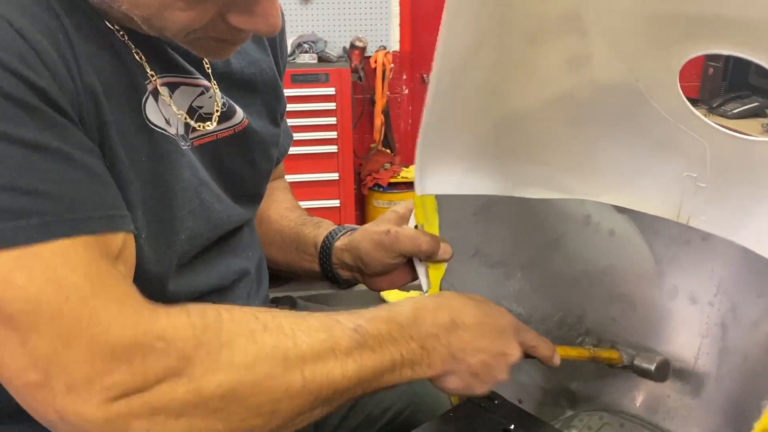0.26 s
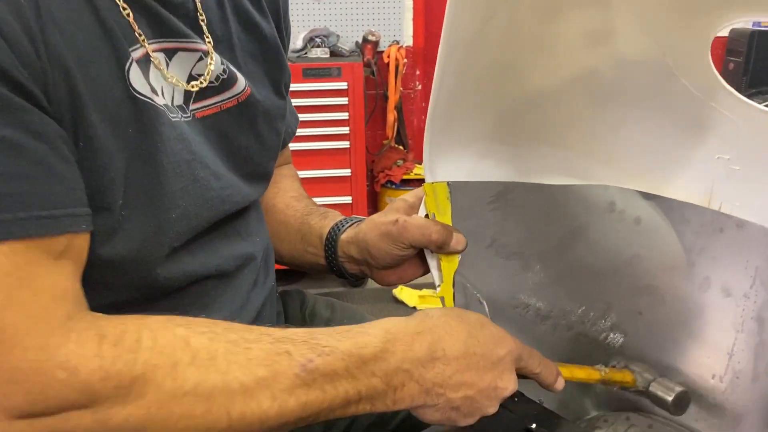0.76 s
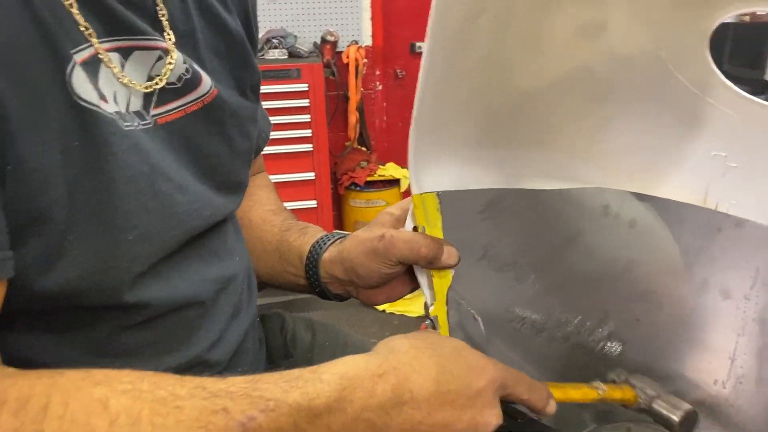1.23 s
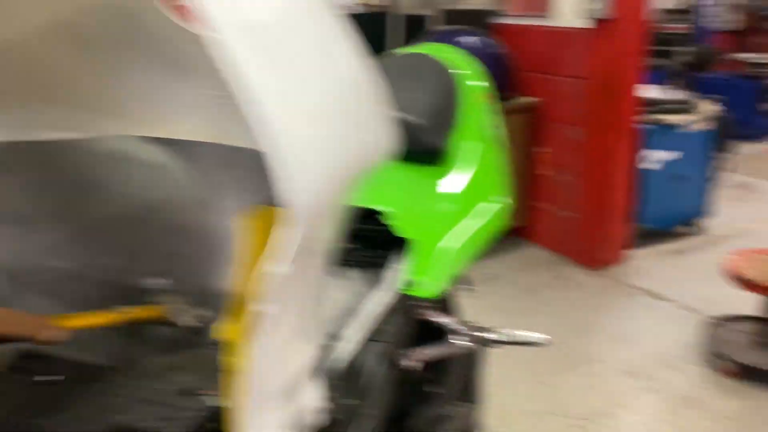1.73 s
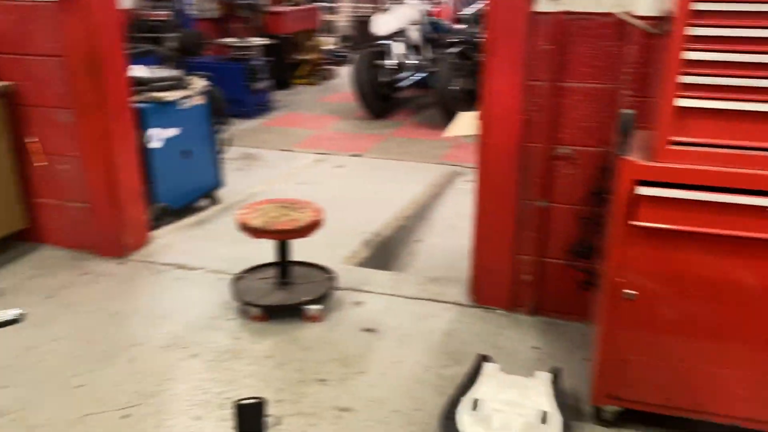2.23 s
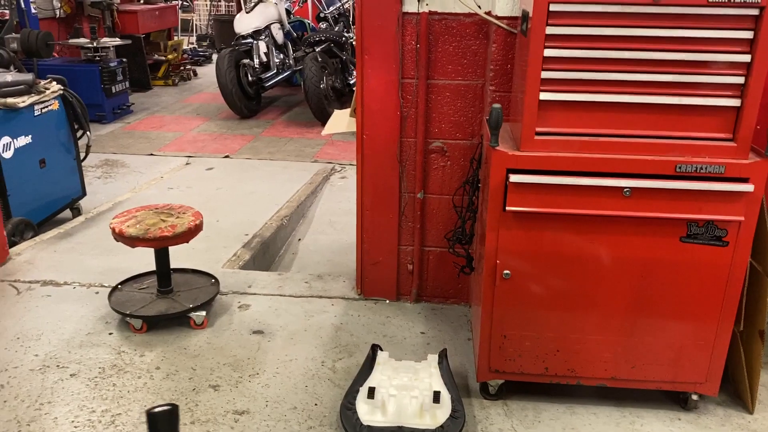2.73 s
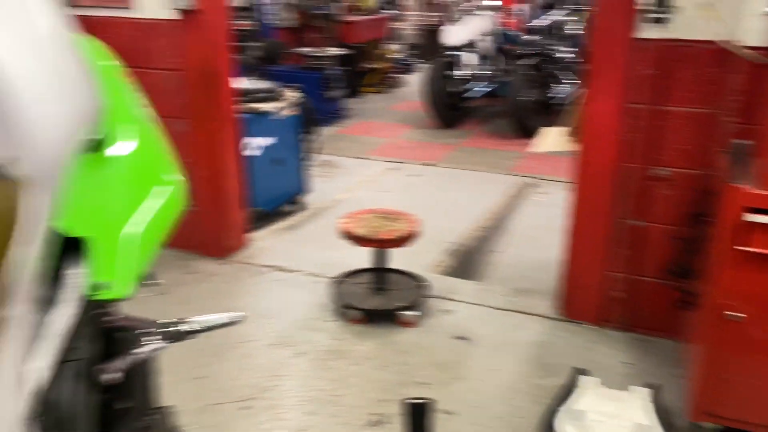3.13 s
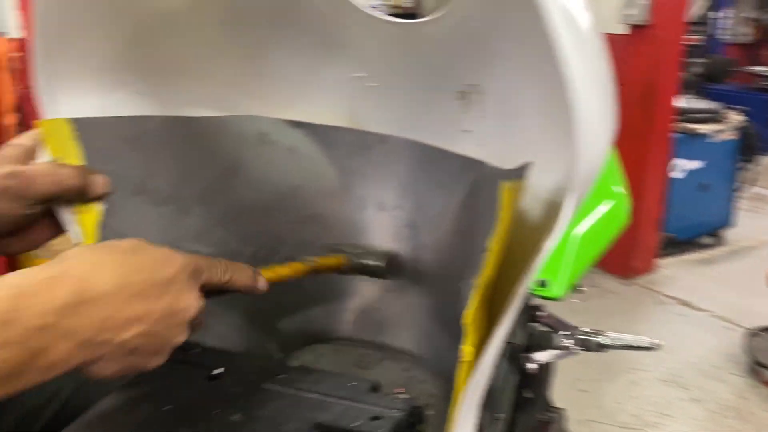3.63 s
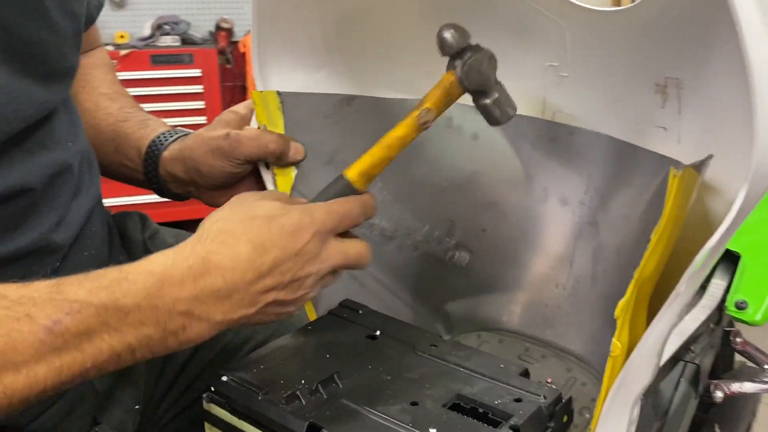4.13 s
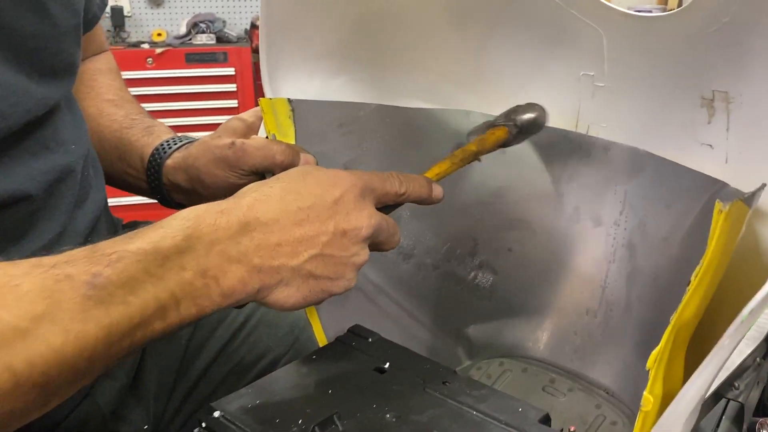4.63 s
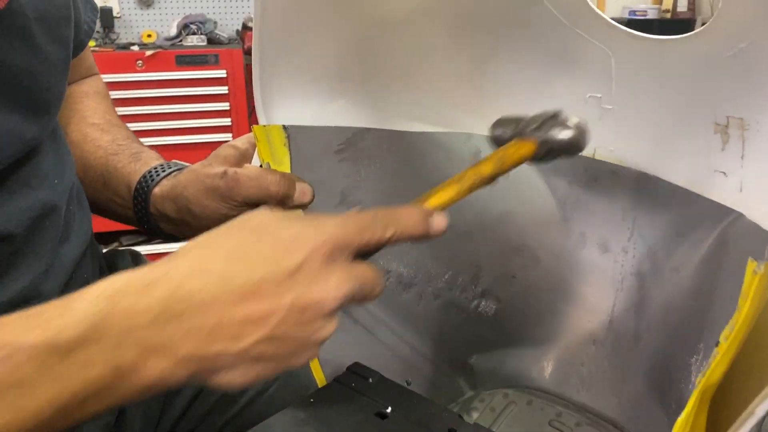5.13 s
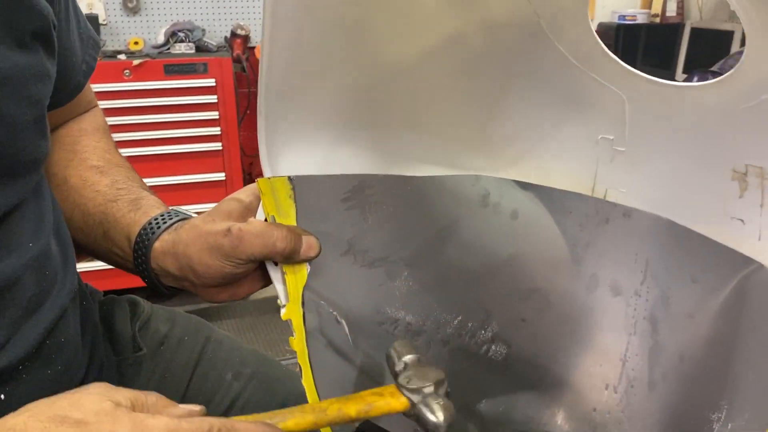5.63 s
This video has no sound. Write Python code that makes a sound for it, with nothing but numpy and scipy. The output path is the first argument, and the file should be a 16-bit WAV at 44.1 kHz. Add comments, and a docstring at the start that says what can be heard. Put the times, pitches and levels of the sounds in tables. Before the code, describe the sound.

Close in a hard-walled workshop, a hammer hits a steel panel backed by a tool. Three sharp, clanging blows come in the first second, then a soft ringing tap and light dull knocks. After a near-quiet pause, a light tap leads to several spaced blows with bright clank and low panel boom. One brief metallic squeak follows a late blow. Low rumble and faint machine hum lie beneath; stereo microphone, short room tail.

```python
"""Hammering a steel panel

A hammer beats a steel fender panel against a backing tool, in short runs, in a workshop.
Each blow sends a dispersive bending wave through the sheet (treble first, bass last), sets its dense,
hand-damped modes clanging as decaying noise bands and sines, and flexes the whole panel in a low boom.
Tools knock lightly (short modal decays); band noise makes a lingering ring, faint hisses and a squeak.
Reverberation answers, low rumble and wavering hum lie beneath, and a limiter holds the peaks."""
import sys
import numpy as np
from scipy import signal
from scipy.fft import rfft, irfft, next_fast_len
from scipy.io import wavfile
from scipy.ndimage import uniform_filter1d, minimum_filter1d

SR = 44100
rng = np.random.default_rng(int(sys.argv[2]) if len(sys.argv) > 2 else 0)


def wrap_up_sound(samples):
    """Save the sound to the file named by the first command line argument, as 16-bit audio."""
    columns = np.atleast_2d(samples).T
    # keep every value between -1 and 1, then stretch to whole-number steps
    tamed = np.clip(columns, -1, 1)
    steps = np.round(tamed * 32767).astype(np.int16)
    wavfile.write(sys.argv[1], SR, steps)


N = 259308  # length [samples]

# the sheet's dense modes: (frequency [Hz], relative spectral density [dB per Hz])
SHEET_DENSITY = [(30, -18), (70, -15.5), (130, -9.5), (185, -3.5), (280, -3.5), (440, -13.5), (640, -0.5),
                 (1250, -6.5), (1650, -11), (3000, -15.5), (4500, -20), (6800, -25.5), (9000, -24.5),
                 (15000, -26), (16500, -31.5)]
# their decay before damping by the blow: (frequency [Hz], 60 dB decay time [s])
SHEET_DECAY = [(60, 0.28), (250, .24), (700, .16), (1400, .13), (3500, .1), (8000, 0.12), (15000, 0.017)]
# the strongest single modes: (frequency [Hz], relative level [dB], decay time before damping [s])
SINGLE_MODES = [(118, -8, 0.17), (137, -7, 0.99), (230.3, -12, 0.31), (273.6, -9, 0.8), (310, -16, 0.74),
                (634, -2.5, 0.23), (746, -8, 0.25), (781, -13.5, 0.14), (858, -9, .16), (1099, -6, 0.15),
                (1178, -2, 0.31), (1321, -4, 0.15), (2320, -16.5, 0.25), (2600, -16, 0.053),
                (3056, -20, .16), (3315, -9.5, 0.064)]
BANDS = 1000 * 2 ** (np.arange(-15, 13) / 3)  # third-octave centres [Hz]
FIRM_BLOW_DB = -21.5  # force at which the sheet's decay times are unscaled


def amp(db):
    """Level definition: decibels to amplitude ratio."""
    return 10 ** (np.asarray(db) / 20)


def along(points, hz):
    """Logarithmic pitch scale: (frequency [Hz], value) points are interpolated on it."""
    f, v = np.transpose(points)
    return np.interp(np.log(hz + 1), np.log(f + 1), v)


def bump(hz, centre_hz, octaves):
    """Resonance region: a Gaussian on the log-frequency axis, top 1."""
    return np.exp(-.5 * (np.log2((hz + 1) / centre_hz) / octaves) ** 2)


def burst(x):
    """Energy normalization: a transient is scaled to the energy of 20 ms at rms 1."""
    energy = np.sum(x ** 2, -1, keepdims=True)
    return x * np.sqrt(SR * .02 / (energy + 1e-20))


def add(track, s, sound):
    """Superposition: a sound is summed into the track at time s, cut at the track's ends."""
    start = round(s * SR)
    part = sound[..., max(-start, 0):N - start]
    begin = max(start, 0)
    track[:, begin:begin + part.shape[-1]] += part


def diffuse(size):
    """Diffuse field: stereo noise spectra whose left-right correlation varies with frequency."""
    # (frequency [Hz], left-right correlation [0 to 1])
    likeness = [(60, 1), (150, .93), (350, 0.55), (800, 0.39), (2000, 0.72), (5000, 0.14)]
    hz = np.fft.rfftfreq(size, 1 / SR)
    turn = np.arccos(np.clip(along(likeness, hz), 0, 1)) / 2
    mid, side = rfft(rng.standard_normal((2, size))) * [np.cos(turn), np.sin(turn)]
    return hz, np.array([mid + side, mid - side])


def background(level_db=-67.5, waver_db=3):
    """Stationary noise and tones: a low shop rumble under the faint, wavering hum of machines."""
    # rumble: (frequency [Hz], relative spectral density [dB per Hz])
    air_density = [(20, -18.5), (55, -4.5), (85, -7), (120, -10.5), (160, -3.5), (210, -27.5), (255, -16.5),
                   (330, -23.5), (480, -22), (650, -28.5), (1200, -31), (3000, -41), (10000, -36),
                   (16000, -44)]
    # distant machines: (frequency [Hz], rms level before wavering [dB])
    hum_tones = [(48.4, -78.5), (253, -86.5), (479, -88)]
    size, t = next_fast_len(N), np.arange(N) / SR
    hz, z = diffuse(size)
    air = irfft(z * amp(along(air_density, hz)), size)[:, :N]
    knots = np.linspace(0, t[-1], 20)
    hum = np.zeros(N)
    for f, db in hum_tones:
        waver = np.interp(t, knots, amp(waver_db * rng.standard_normal(len(knots))))
        hum += amp(db) * np.sqrt(2) * waver * np.sin(2 * np.pi * f * t)
    return amp(level_db) * air / air.std() + hum


def in_shop(sound, size=32768, first_wall_s=0.0058):
    """Reverberation: direct sound, then wall and floor reflections decaying exponentially by frequency."""
    # (frequency [Hz], 60 dB decay time [s])
    shop_decay = [(80, 1), (250, 0.67), (700, 0.44), (1500, 0.6), (4000, 0.6), (8000, 0.49), (15000, 0.16)]
    # (frequency [Hz], reverberation level [dB])
    shop_level = [(50, -22.5), (250, -8), (600, -10.5), (1500, -11.5), (4000, -13.5), (8000, -14),
                  (15000, -22.5)]
    hz, t, z = signal.stft(irfft(diffuse(size)[1]), SR, nperseg=256)
    t60 = along(shop_decay, hz)[:, None]
    unit_energy = np.sqrt(2 * np.log(1000) / (t60 * SR))
    fade = amp(along(shop_level, hz))[:, None] * np.exp(-np.log(1000) * t / t60) * unit_energy
    onset = 1 - np.exp(-(t / first_wall_s) ** 2)
    tail = signal.istft(z * fade * onset, SR, nperseg=256)[1]
    tail[:, 0] += 1  # the direct path
    return signal.fftconvolve(sound, tail, axes=1)


def travel(hz, lag_s=.014):
    """Dispersion: a bending wave's bass arrives last; lag_s is its delay at 100 Hz."""
    return lag_s * 100 / np.maximum(hz, 55)


def decays(band_db, t60, size):
    """Modal density: a crowd of modes as third-octave noise, each with its level, arrival and decay."""
    hz, z = diffuse(size)
    # neighbouring bands overlap so that their energies sum to one
    place = np.log((hz + 1) / BANDS[0]) / np.log(BANDS[1] / BANDS[0])
    distance = np.abs(place - np.arange(len(BANDS))[:, None])
    split = np.sqrt(np.maximum(1 - distance, 0)).astype(np.float32)
    age = np.maximum(np.arange(size) / SR - travel(BANDS)[:, None], 0).astype(np.float32)
    rise = (0.0011 + 1 / (np.pi * BANDS[:, None])).astype(np.float32)  # low modes build up slowly
    decay_rate = (-np.log(1000) / t60[:, None]).astype(np.float32)
    fade = (1 - np.exp(-age / rise)) * np.exp(np.maximum(age * decay_rate, -20))
    crowd = irfft(z[:, None].astype(np.complex64) * split, size) * fade
    return np.sum(burst(crowd) * amp(band_db)[:, None].astype(np.float32), 1)


def tools(size=4096, light_knock_db=-60):
    """Impact and band-limited noise: light knocks, a lingering ring, faint hisses and a brief squeak."""
    # knocks: (time [s], nominal level [dB], spectral centre [Hz])
    knocks = [(1.218, -54.5, 170), (1.447, -79, 798), (1.501, -61, 260), (1.518, -53.5, 116),
              (1.673, -64, 368), (1.73, -64.5, 446), (1.814, -50, 307.5), (1.87, -63.5, 420),
              (1.975, -69.5, 400), (1.995, -55.5, 249.2), (3.211, -70, 199.4)]
    # steel touching steel: (frequency [Hz], relative level [dB per band])
    click_spectrum = [(300, 0), (1200, -3.5), (3000, -3), (7000, 1.5), (14000, 1)]
    # the sheet's lingering 1-2 kHz ring after the soft tap, then faint hisses, last a brief metallic
    # squeak near 2.2 kHz: (time [s], length [s], level before the envelope [dB], centre [Hz], width [octaves])
    faint_sounds = [(1.04, 0.33, -56, 1200, 0.62), (1.506, 0.18, -61.5, 1200, 2.43),
                    (1.738, 0.084, -65.5, 1200, 1.1), (2.008, .17, -74, 902, 1.2),
                    (5.023, 0.032, -32.5, 2160, .07)]
    base_click_db, click_growth = -76, 0.42  # nominal click of a light knock; dB per dB of knock
    knock_damping = .42  # ratio to the sheet's decay times
    track = np.zeros((2, N))
    for s, knock_db, knock_hz in knocks:
        knock_band_db = knock_db - 4 - 6 * np.abs(np.log2(BANDS / knock_hz)) ** 1.6
        knock = decays(knock_band_db, knock_damping * along(SHEET_DECAY, BANDS), size)
        click_db = base_click_db + click_growth * (knock_db - light_knock_db)
        click_band_db = click_db - 5.5 + along(click_spectrum, BANDS)
        click = decays(click_band_db, np.full(len(BANDS), .11), size)
        add(track, s, knock + click)
    for s, length_s, db, centre_hz, octaves in faint_sounds:
        hz, z = diffuse(4 * size)
        band_noise = irfft(z * bump(hz, centre_hz, octaves))
        u = np.arange(4 * size) / SR / length_s
        envelope = np.clip(20 * u, 0, 1) * np.clip(1 - u, 0, 1) ** 1.65  # quick rise, gradual fall
        add(track, s, amp(db) * envelope * band_noise / band_noise.std())
    return in_shop(track)[:, :N]


def boom(centre_hz, size, octaves=0.56, round_trip_s=0.032, edge_db=-10, delay_s=.016):
    """Edge reflection: the whole panel flexes in a falling chirp that returns ever weaker from the edges."""
    hz = np.fft.rfftfreq(size, 1 / SR)
    # phase is the integral of group delay over frequency
    phase = 2 * np.pi * np.cumsum(travel(hz, lag_s=.008) + delay_s) * hz[1]
    returns = 1 / (1 - amp(edge_db) * np.exp(-2j * np.pi * hz * round_trip_s))
    return burst(irfft(bump(hz, centre_hz, octaves) * returns * np.exp(-1j * phase), size))


def first_wave(size, centre_hz=450, octaves=0.47, contact_s=.002):
    """Dispersive propagation: the first bending wave to leave the spot is one quick falling chirp."""
    hz = np.fft.rfftfreq(size, 1 / SR)
    phase = 2 * np.pi * np.cumsum(travel(hz) + contact_s) * hz[1]
    spectrum = amp(along(SHEET_DENSITY, hz)) * bump(hz, centre_hz, octaves)
    chirp = irfft(spectrum * np.exp(-1j * phase), size)
    return burst(chirp * np.linspace(1, 0, size) ** 2)


def spot(hz, centre_hz):
    """Modal excitation: the region of modes that a struck spot favours."""
    return bump(hz, centre_hz, octaves=.24)


def ring_length(force_db, halving_db=7.5, longest=1.15):
    """Contact damping: a harder blow presses the sheet onto the backing tool and shortens its ring."""
    return min(2 ** ((FIRM_BLOW_DB - force_db) / halving_db), longest)


def single_modes(lift_db, length, size):
    """Modal superposition: the strongest modes as damped sines, struck at new strengths by every blow."""
    hz, db, t60 = np.transpose(SINGLE_MODES)
    age = np.maximum(np.arange(size) / SR - travel(hz)[:, None], 0)
    phase = rng.uniform(0, 2 * np.pi, (len(hz), 1))
    fade = (1 - np.exp(-age / .003)) * np.exp(-np.log(1000) * age / (length * t60[:, None]))
    strength = amp(db + lift_db + rng.normal(0, 2.5, len(hz)))
    return strength @ burst(fade * np.sin(2 * np.pi * hz[:, None] * age + phase))


def hammer(size=18000, chatter_db=-12.0, rebound_db=-3, ring_db=-8, looseness=0.24, clank_hz=1750):
    """Impact excitation: crack and rebound, first bending wave, dense clang, single modes and boom."""
    # blows: (time [s], force [dB], boom level [dB], boom centre [Hz], struck spot's centre [Hz],
    #         spot lift [dB], clank lift [dB], crack treble lift [dB])
    blows = [(-.17, -20, -18.5, 70, 1030, 1, 3, 2), (.074, -36.5, -13.5, 84, 280, 1, -6.5, -23),
             (0.0854, -17, -25.5, 111, 1110, 3.5, 0, -3), (.3490, -18.5, -25.5, 141.7, 1060, 2.5, 2.5, 1.5),
             (0.67, -21.5, -27.5, 118.6, 695, 4, 2, -0.5), (1.039, -43.5, -40, 95.8, 850, -2.5, -8, -14),
             (2.9061, -37, -41.5, 134.4, 2280, 7, -4, 4), (3.4450, -19, -22.5, 120, 804, 3.5, 1, 1.5),
             (3.7784, -20.5, -25, 130.2, 782, 8, 2, 5), (4.5434, -27.5, -35, 120, 1190, 2, 3.5, 4.5),
             (4.9212, -21, -25, 126.1, 2256, 0.5, 4.5, 1.5),
             (5.8391, -24, -23.5, 117, 1300, 2.5, 6.5, -2.5)]
    # the panel's bearing as the microphone turns: (time [s], left over right [dB])
    bearing = [(.7, 0.5), (2.9, 2.5), (3.45, 4), (3.8, 3), (4.5, 2)]
    wave_db = -4  # first bending wave, relative to the force
    rebound_s = .008  # the backing tool slaps back this long after the hammer
    spot_focus = 1.0  # extra share of a light tap's gain for the struck spot's modes
    track = np.zeros((2, N))
    treble = BANDS ** 2 / (BANDS ** 2 + 3500 ** 2)
    sheet_db = along(SHEET_DENSITY, BANDS) + 10 * np.log10(BANDS / 1000)  # density to band level
    mode_hz = np.array(SINGLE_MODES)[:, 0]
    for s, force_db, boom_db, boom_hz, spot_hz, spot_db, clank_db, crack_db in blows:
        # the struck spot favours one region of modes; a squarer, harder contact adds clank and crack
        def lift(hz):
            return spot_db * spot(hz, spot_hz) + clank_db * bump(hz, clank_hz, octaves=.65)

        colour_db = sheet_db + lift(BANDS) + crack_db * treble
        length = ring_length(force_db)
        blow = np.zeros((2, size))
        add(blow, 0, amp(wave_db) * first_wave(size))
        add(blow, 0, decays(colour_db, length * along(SHEET_DECAY, BANDS), size=8192))

        # a light tap does not clamp the sheet, so single modes stand out, above all the struck spot's
        focus = 1 + spot_focus * spot(mode_hz, spot_hz)
        free_db = looseness * (FIRM_BLOW_DB - force_db) * focus
        add(blow, 0, amp(ring_db) * single_modes(lift(mode_hz) + free_db, length, size))

        # the steel chatters brightly under the hammer, and again as the backing tool slaps back
        contacts = [(0, chatter_db, 13), (rebound_s, chatter_db + rebound_db, 4)]
        for delay, level_db, brightness_db in contacts:
            chatter_band_db = colour_db + level_db + brightness_db * treble
            add(blow, delay, decays(chatter_band_db, .03 - 0.0078 * treble, size=1536))

        blow = amp(force_db) * blow + amp(boom_db) * boom(boom_hz, size)
        pan_db = np.interp(s, *np.transpose(bearing))
        add(track, s, in_shop(blow * amp([[pan_db / 2], [-pan_db / 2]])))
    return track


def scene():
    """Superposition: blows, light tool sounds and the shop's background."""
    return hammer() + tools() + background()


def limiter(x, size=130):
    """Peak limiting: the gain of both sides dips for a few milliseconds around each peak."""
    needed = np.minimum(1, .92 / (np.abs(x).max(0) + 1e-9))
    return x * uniform_filter1d(minimum_filter1d(needed, 2 * size), size)


def record(dry, split_hz=6400, lag_s=0.00027, top_hz=16000):
    """Interchannel coherence: sides share most of the top octaves, left late; then limit and low-pass."""
    size = next_fast_len(N + SR // 2)
    hz = np.fft.rfftfreq(size, 1 / SR)
    z = rfft(dry, size)
    shared = .75 * np.clip((hz - split_hz) / 1200 + .5, 0, 1)
    # half the lag delays the left, half advances the right, above the split only
    side_sign = np.array([[-1], [1]])
    turn = np.exp(1j * np.pi * lag_s * np.maximum(hz - split_hz, 0) * side_sign)
    z = ((1 - shared) * z + shared * z.sum(0) * 0.54) * turn
    limited = limiter(irfft(z, size))
    steep_lowpass = 1 / np.sqrt(1 + (hz / top_hz) ** 160)
    return irfft(rfft(limited) * steep_lowpass, size)[:, :N]


dry = scene()
out = record(dry)
wrap_up_sound(out)
```